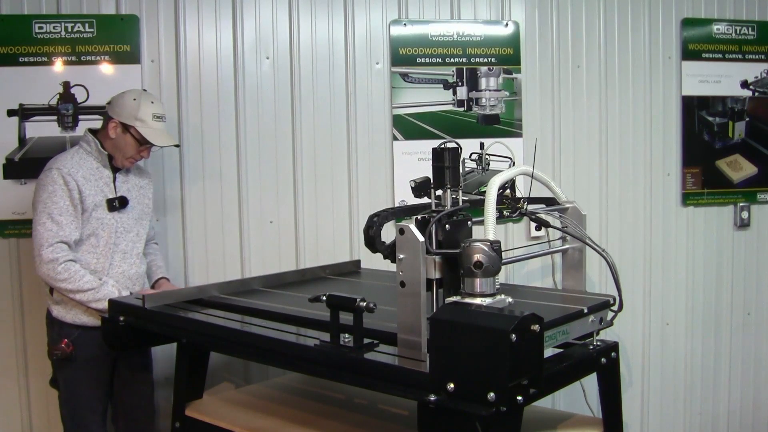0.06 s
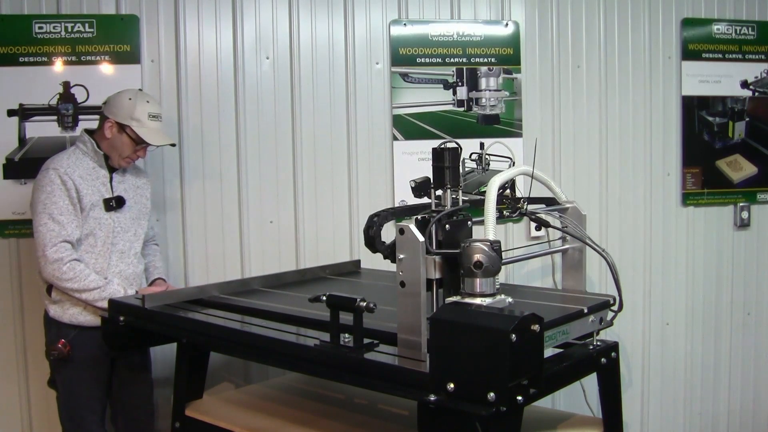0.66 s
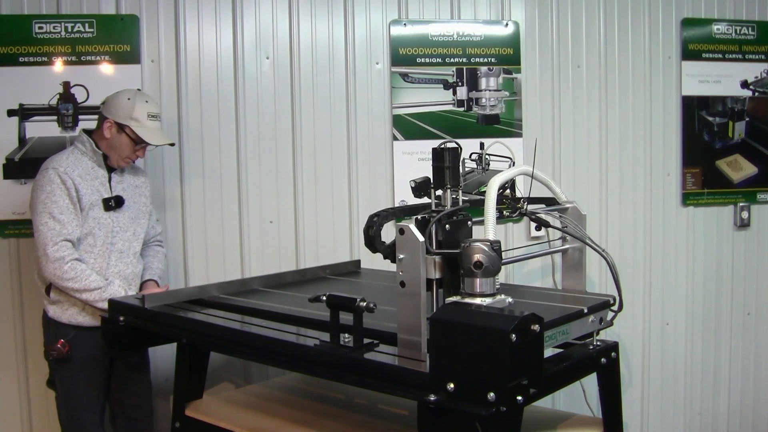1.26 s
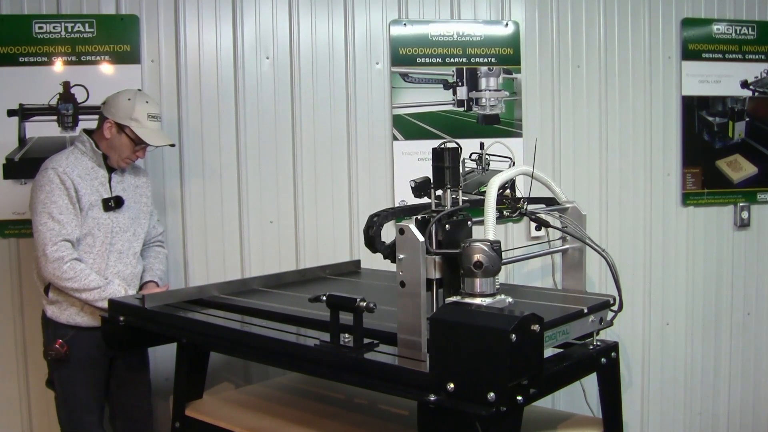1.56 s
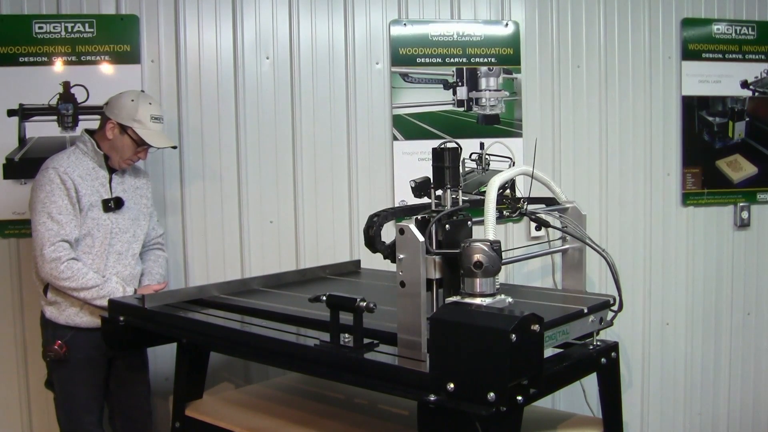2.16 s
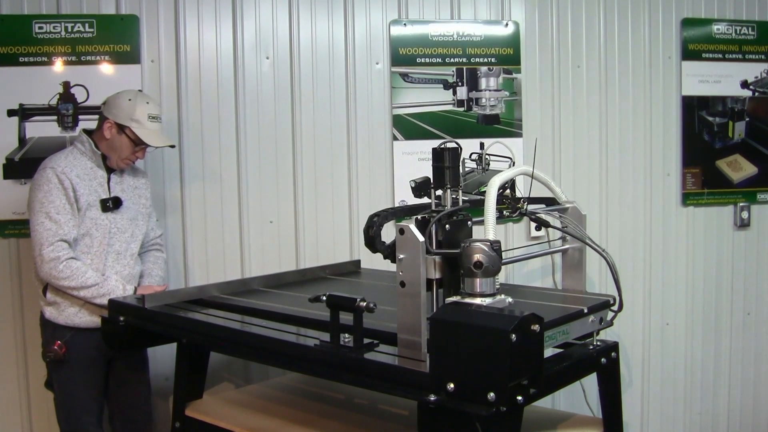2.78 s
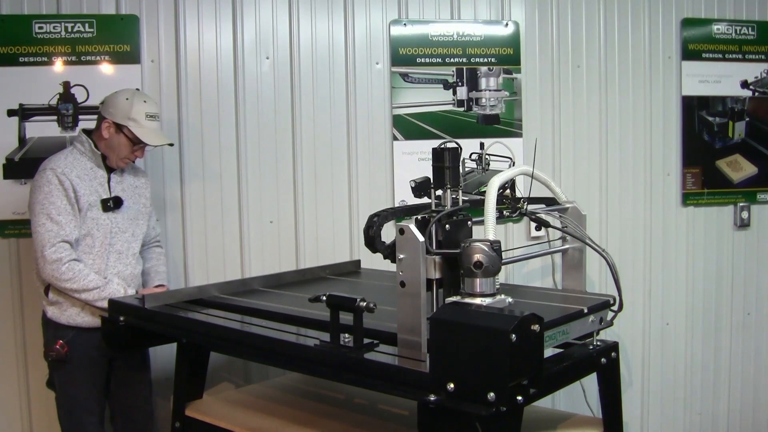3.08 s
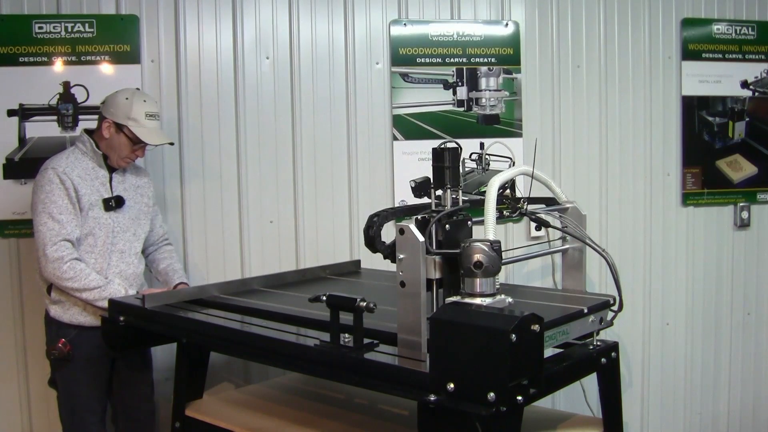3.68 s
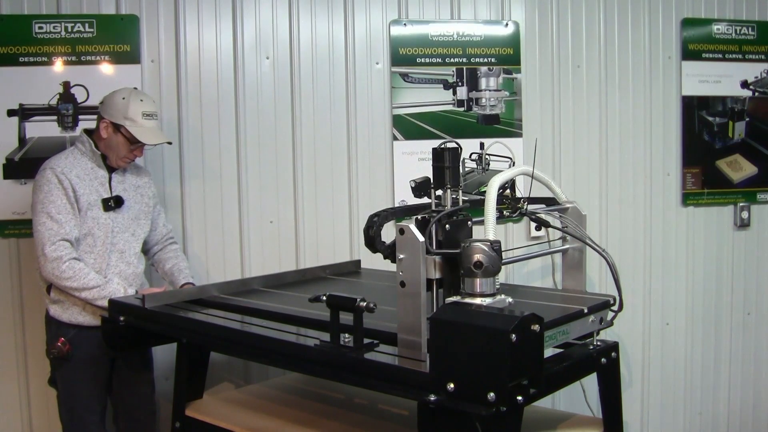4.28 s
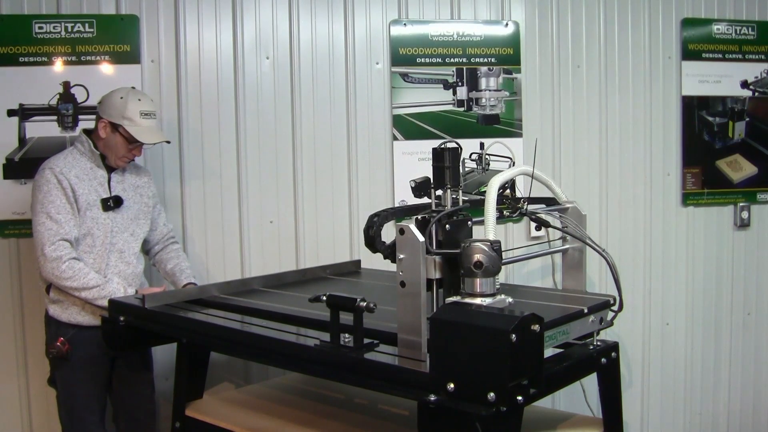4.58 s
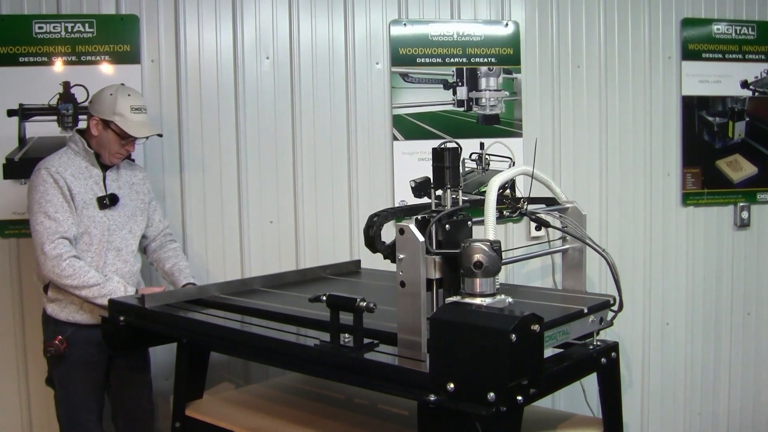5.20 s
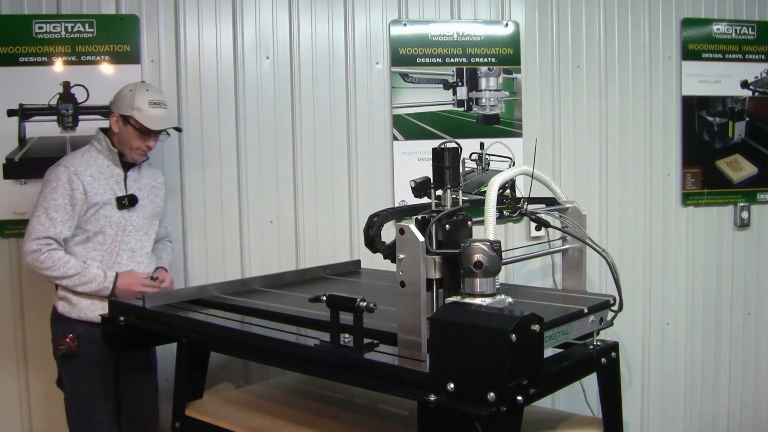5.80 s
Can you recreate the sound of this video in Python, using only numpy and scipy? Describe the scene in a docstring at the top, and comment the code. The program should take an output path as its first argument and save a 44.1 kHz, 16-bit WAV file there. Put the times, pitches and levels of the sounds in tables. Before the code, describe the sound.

In a small workshop, steel nuts and a clamp are handled on a slotted metal machine table. A sharp clang opens, followed by irregular knocks and pings. A nut whirrs briefly down its thread, then a hard knock rings out and a few tiny ticks follow. Near the end the clamp slides along its slot, hits home with a loud clang and scrapes softly again. Faint room noise lies underneath.

```python
"""A sharp clang, then knocks: steel nuts and a clamp are handled on a slotted machine table.
Each contact thuds in the bed, clangs in the rail and pings in the nut; a small workshop answers.
A nut whirrs down its thread, which later ticks. Near the end the clamp slides along its slot
and hits home. Faint room noise lies under it all."""
import sys
import numpy as np
from scipy import signal
from scipy.fft import rfft, irfft, next_fast_len
from scipy.io import wavfile
from scipy.ndimage import map_coordinates

SR = 44100
rng = np.random.default_rng(int(sys.argv[2]) if len(sys.argv) > 2 else 0)


def master_out(mix):
    """Clip the mix to full scale and print it as 16-bit PCM to the path in sys.argv[1]."""
    frames = np.transpose(np.atleast_2d(mix))
    ceiling = np.clip(frames, -1, 1)
    pcm = np.round(ceiling * 32767).astype(np.int16)
    wavfile.write(sys.argv[1], SR, pcm)


N = 257852
BLOW_SAMPLES = 24576


def amp(db):
    """Decibels to gain."""
    return 10 ** (np.asarray(db) / 20)


def unit(x):
    """Scale to rms 1."""
    return x / np.sqrt(np.mean(x ** 2) + 1e-20)


def along(points, hz):
    """Read a curve on a log frequency axis."""
    freqs, values = np.transpose(points)
    return np.interp(np.log(hz + 1), np.log(freqs), values)


def wobble(rate_hz):
    """Smooth random curve through rate_hz knots a second."""
    return map_coordinates(rng.standard_normal(2048), [np.arange(N) * rate_hz / SR], mode="wrap")


def noise(spectrum, size, tilt_db_oct=0):
    """Coloured noise of rms 1."""
    n_fft = next_fast_len(size)
    hz = np.fft.rfftfreq(n_fft, 1 / SR)
    gain = amp(along(spectrum, hz) + tilt_db_oct * np.log2(hz + 1))
    return unit(irfft(rfft(rng.standard_normal(n_fft)) * gain, n_fft)[:size])


def add(track, start_s, sound):
    """Mix a sound in at start_s."""
    start = round(start_s * SR)
    track[start:start + len(sound)] += sound[:N - start]


def decay(t, t60_s):
    """Free vibration falls 60 dB in t60_s."""
    return np.exp(-np.log(1000) * t / t60_s)


def onset(rise_s):
    """Build-up of a vibration."""
    return 1 - np.exp(-np.arange(BLOW_SAMPLES) / SR / rise_s)


def stroke(start_s, end_s, attack_s, release_s):
    """Speed, 0-1, of a movement that builds, holds and dies away."""
    t = np.arange(N) / SR
    attack = 1 - np.exp(-np.maximum(t - start_s, 0) / attack_s)
    return attack * np.exp(-np.maximum(t - end_s, 0) / release_s)


def ring(modes, t60_s, tilt_db_oct=0):
    """Clear modes take a new phase and strength at each blow."""
    hz, db = np.transpose(modes)[:2, :, None]
    t = np.arange(BLOW_SAMPLES) / SR
    strength = amp(db + tilt_db_oct * np.log2(hz / np.median(hz)) + rng.standard_normal(hz.shape))
    phase = 2 * np.pi * (hz * t + rng.random(hz.shape, dtype=np.float32))
    return np.sum(strength * decay(t, t60_s) * np.sin(phase), axis=0)


def body(spectrum, ragged_db, spacing_hz):
    """Crowded modes carve a part's spectrum into narrow peaks and valleys."""
    hz = np.arange(1, 1001) * spacing_hz
    depth_db = ragged_db * np.clip(hz / 1500, 0, 1)
    ripple_db = depth_db * np.clip(rng.standard_normal(len(hz)), -2, 2)
    return np.column_stack([hz, along(spectrum, hz) + ripple_db])


# Room air and low rumble spectra: freq_hz, density_db
AIR_SPECTRUM = [(12, -55), (20, -17), (60, -2.5), (127, -2), (146, -16), (177, -1), (204, -14), (241, -4.5),
                (328, -12), (472, -10), (678, -14.5), (802, -15.5), (2460, -21.5), (5230, -21.5),
                (16000, -32)]
RUMBLE_SPECTRUM = [(18, -22), (35, -3.5), (70, -1.5), (130, -4), (300, -48.5)]
def background(spin):
    """Steady room air, and a soft rumble while the nut spins."""
    return amp(-68.5) * noise(AIR_SPECTRUM, N) + amp(-60.5) * spin * noise(RUMBLE_SPECTRUM, N)


# Room decay: freq_hz, t60_s
ROOM_DECAY = [(130, 1), (250, 1), (400, 0.57), (1000, 0.53), (2200, 0.63), (5000, 0.54), (8000, 0.44),
              (14000, 0.297)]
def burst(spectrum, t60_s, room_db, tilt_db_oct=0):
    """Crowded modes die fast; the darker room holds each frequency for its own time."""
    direct = noise(spectrum, BLOW_SAMPLES, tilt_db_oct + 0.8) * decay(np.arange(BLOW_SAMPLES) / SR, t60_s)
    hz, t, bands = signal.stft(noise(spectrum, BLOW_SAMPLES, tilt_db_oct), SR, nperseg=256)
    bands *= decay(t, along(ROOM_DECAY, hz)[:, None])
    _, tail = signal.istft(bands, SR, nperseg=256)
    return direct + amp(room_db) * tail[:BLOW_SAMPLES]


# Thread ticks: start_s, level_db, tilt_db_oct
THREAD_TICKS = [(2.969, -56.5, 0), (3.031, -59.5, 0), (3.852, -57.5, 8)]
# Tick spectrum: freq_hz, density_db
TICK_SPECTRUM = [(300, -18), (1100, 12), (2000, -4), (4000, -13.5), (8000, -20), (16000, -75)]
def ticks():
    """The thread settles with tiny dry snaps."""
    out = np.zeros(N)
    for start_s, level_db, tilt_db_oct in THREAD_TICKS:
        snap = burst(TICK_SPECTRUM, t60_s=0.026, room_db=-16, tilt_db_oct=tilt_db_oct)
        add(out, start_s, amp(level_db) * snap)
    return out


# Thread friction spectrum: freq_hz, density_db
WHIRR_SPECTRUM = [(900, -20), (1700, -18), (2050, 3.5), (2600, 0), (3200, 7), (4500, -1.5), (6100, 0),
                  (7500, -5.5), (11000, -12), (15500, -21)]
def whirr(spin):
    """A flicked nut rubs down its thread and coasts to rest."""
    flutter = amp(1.5 * wobble(rate_hz=68))
    return amp(-65.5) * spin * unit(flutter * noise(WHIRR_SPECTRUM, N))


# Clamp pushes: start_s, end_s, full_speed_db
PUSHES = [(4.69, 5.27, -60), (5.568, 5.85, -53.5)]
# Slot friction spectrum: freq_hz, density_db
SLOT_SPECTRUM = [(120, -17), (200, -5), (224, -8), (316, -7.5), (379, 3), (639, -13), (791, -7),
                 (1010, -22), (1120, -19), (1250, -26), (2410, -23.5), (2980, -14), (3930, -23),
                 (5030, -19.5), (10000, -40), (13000, -70), (22000, -120)]
def slide():
    """The clamp rubs along the slot, catching unevenly; the bed hums under the hiss."""
    push = sum(amp(db) * stroke(start_s, end_s, attack_s=0.18, release_s=0.02)
               for start_s, end_s, db in PUSHES)
    catching = amp(0.85 * wobble(rate_hz=22) + 0.47 * wobble(rate_hz=120))
    return push * unit(catching * noise(SLOT_SPECTRUM, N))


# Crowded weak modes of bed and rail: freq_hz, density_db
BED_SPECTRUM = [(25, -68.5), (80, -35), (140, -13), (270, -14), (370, -1), (560, -5), (800, -4),
                (1200, -8.5), (1420, -18.5), (1780, -25), (2030, -19), (2400, -30), (6000, -64),
                (16000, -83)]
RAIL_SPECTRUM = [(200, -33.5), (700, 6.5), (1150, -1.5), (1420, -8), (1620, 7), (1780, -7.5), (2030, 6.5),
                 (2200, -6), (2550, 3), (3300, -4), (4700, -4.5), (6000, -43.5), (9000, -30),
                 (16000, -55.5)]
def table_bodies():
    """Bed and rail keep the same ragged spectra for every contact."""
    return (body(BED_SPECTRUM, ragged_db=5, spacing_hz=25.14),
            body(RAIL_SPECTRUM, ragged_db=4.5, spacing_hz=35.17))


def drag(swell_db_per_s=350):
    """Dragged parts rasp on the bed, ever louder until they seat."""
    t = np.arange(N) / SR
    swell = sum((t < seat_s) * amp(approach_db - 7 - swell_db_per_s * np.abs(seat_s - t))
                for seat_s, _, approach_db, *_ in SEATINGS)
    flutter = amp(0.83 * wobble(rate_hz=94))
    return swell * unit(flutter * noise(BED_SPECTRUM, N, tilt_db_oct=-2.5))


# Clear modes of bed and rail: pitch_hz, level_db
BED_RING = [(375, 3.5), (408, 0.5), (474, -5), (495, 0), (538, -11.5), (614, -15), (660, -4), (722, -11.5),
            (764, -6.5), (813, -12), (878, -10), (980, -5.5), (998, -6), (1030, -13), (1130, -10.5),
            (1238, -8.5), (1280, -15.5)]
RAIL_RING = [(1476, -12.5), (1990, -1.5), (2024, 3), (2060, -2), (2350, -2), (2584, -9.5), (3106, -4),
             (3480, -4.5), (4700, -17)]
# Nut ping and contact crack spectra: freq_hz, density_db
NUT_SPECTRUM = [(500, -20), (2000, -17), (3500, -9.5), (4600, 0), (5800, -4.5), (6900, -4.5), (7800, -12),
                (11000, -31), (16000, -43)]
CRACK_SPECTRUM = [(500, -2), (2500, -7), (5000, -4.5), (8000, 3), (11000, 1), (14000, -9.5), (16000, -18.5)]
def contact(bodies, bed_gain, tilt_db_oct, rail_gain, nut_db, crack_db):
    """One contact cracks and shakes bed, rail and nut; the wide bed rings up slowly."""
    bed_body, rail_body = bodies
    hum = amp(-6) * onset(rise_s=0.0079) * ring(BED_RING, t60_s=0.48, tilt_db_oct=tilt_db_oct)
    thud = amp(-0.79) * burst(bed_body, t60_s=0.13, room_db=-4, tilt_db_oct=tilt_db_oct)
    clang = burst(rail_body, t60_s=0.09, room_db=-4.5) + amp(-18.5) * ring(RAIL_RING, t60_s=0.63)
    nut_body = body(NUT_SPECTRUM, ragged_db=5, spacing_hz=68.4)  # new with every grip
    ping = amp(1.5) * burst(nut_body, t60_s=0.042, room_db=-14.5)
    crack = burst(CRACK_SPECTRUM, t60_s=0.033, room_db=-14.5)
    return bed_gain * (thud + hum) + rail_gain * clang + amp(nut_db) * ping + amp(crack_db) * crack


# Parts set down and bumped: start_s, force_db, rail_share, hardness, bed_tilt_db_oct, rise_s
BUMPS = [ (0.000, -38, 0.74, 0.95, 7, 0.0032), (0.367, -55, 0.41, 0.72, 2, 0.0025),
         (0.459, -59.5, 0.2, .25, -2, 0.0038), (0.736, -31.5, 0.14, .64, 1, 0.00047),
         (0.781, -34, .1, 0.6, -2.5, 0.0014), (1.498, -47.5, 0, 0.35, 2, 0.0017),
         (1.636, -40, 0.14, .42, 7.5, 0.00051), (1.661, -41.5, 0, 0.58, 0, 0.0046),
         (1.681, -42.5, 0.04, 0.6, 8.5, 0.0027), (1.704, -31, 0.14, 0.51, 2.5, 0.0011),
         (1.981, -43.5, 0.07, 0.3, 0, 0.0065), (2.078, -39.2, 0.09, .33, 2.5, 0.012),
         (2.127, -40, 0.24, 0.68, -0.5, 0.0017), (2.141, -36, 0.23, 0.58, 1, 0.0017),
         (3.170, -63, .4, 0.8, -0.5, 0.005), (3.666, -64, .3, .2, -4, 0.0042),
         (4.155, -65.5, 0.58, 0.88, -2, 0.0057), (5.304, -37.5, .92, 0.3, 0, 0.0049),
         (5.336, -22.5, 0.41, 0.1, 2.5, 0.0043), (5.387, -41.5, 0, 0.98, -5.5, 0.0013),
         (5.814, -55, 0, .15, 6, 0.0034), ]
def knocks(bodies):
    """Bed and rail share the force of a knock; hardness, 0-1, adds ping and crack."""
    out = np.zeros(N)
    # a light touch precedes each seating; columns as in BUMPS
    touches = [(touch_s, approach_db, 0.24, 0.59, 4.5, 0.0073) for _, touch_s, approach_db, *_ in SEATINGS]
    for start_s, force_db, rail_share, hardness, tilt_db_oct, rise_s in BUMPS + touches:
        bed_gain = amp(force_db) * (1 - rail_share)
        rail_gain = amp(force_db) * rail_share
        nut_db = force_db - 35 + 41 * hardness
        crack_db = force_db - 35.5 + 22.5 * hardness
        blow = contact(bodies, bed_gain, tilt_db_oct, rail_gain, nut_db, crack_db)
        add(out, start_s, blow * onset(rise_s))
    return out


# Nut modes: pitch_hz, level_db, t60_s
NUT_RING = [(4400, -11.5, .5), (4840, -12, 0.32), (5770, 14.5, 0.037), (5780, -10.5, .36),
            (6239, -11, 0.26), (6800, -26, 0.35), (9680, 8, 0.035), (9690, -22, 0.23)]
# Bolt and clamp modes: pitch_hz, level_db
BOLT_RING = [(538, -0.5), (1476, 2), (1530, 2), (1610, -6.5), (2137, -24.5), (3480, -11.5), (4920, -14),
             (5626, -23.5)]
CLAMP_RING = [(726, -0.5), (768, 2), (825, -2.5), (880, -2.5), (1101, 6), (1195, -0.5), (1260, -1),
              (1637, 0), (1695, 6.5), (1820, -5), (1938, -13), (2207, -4.5), (2297, -6), (2414, -8.5),
              (2640, -10.5), (2869, -9), (2997, -1.5), (3176, -5.5), (3289, -3.5), (3343, -1), (4280, -5.5),
              (4400, -15.5), (6185, -13), (7265, -19.5)]
# Hard hits that seat a part: seat_s, touch_s, approach_db, bed_db, bed_tilt_db_oct, rail_db,
# nut_db, crack_db, nut_ring_db, bolt_ring_db, clamp_ring_db
SEATINGS = [ (1.100, 1.080, -38.5, -34.5, 0, -41.5, -28, -49, -38.5, -87, -84),
            (2.589, 2.563, -40, -23.5, 1.5, -39.5, -34.5, -32, -51, -37, -59),
            (5.317, 5.277, -41.5, -30, 3.5, -25.5, -24, -40, -48.5, -78, -37.5), ]
def strikes(bodies):
    """A part hits home: the nut pings; the bolt and the heavier clamp ring on."""
    out = np.zeros(N)
    for seat_s, _, _, bed_db, tilt_db_oct, rail_db, nut_db, crack_db, *rings_db in SEATINGS:
        nut_ring_db, bolt_ring_db, clamp_ring_db = rings_db
        blow = contact(bodies, amp(bed_db), tilt_db_oct, amp(rail_db), nut_db, crack_db)
        nut = amp(nut_ring_db) * ring(NUT_RING, t60_s=np.array(NUT_RING)[:, 2:])
        bolt = amp(bolt_ring_db) * ring(BOLT_RING, t60_s=0.35)
        clamp = amp(clamp_ring_db + 1.5) * ring(CLAMP_RING, t60_s=0.55)
        add(out, seat_s, onset(rise_s=0.00067) * (blow + nut + bolt + clamp))
    return out


def scene():
    """Mono mix; the steel knocks and strikes carry hardly any deep bass."""
    bodies = table_bodies()
    bass_cut = signal.butter(2, 95, "highpass", fs=SR, output="sos")
    steel = signal.sosfilt(bass_cut, knocks(bodies) + strikes(bodies))
    spin = stroke(start_s=1.785, end_s=1.956, attack_s=0.018, release_s=0.078)
    return (steel + ticks() + whirr(spin) + drag() + slide() + background(spin))[None]


def record(dry):
    """Brick-wall low-pass on the top treble."""
    n_fft = next_fast_len(N + SR)
    hz = np.fft.rfftfreq(n_fft, 1 / SR)
    return irfft(rfft(dry, n_fft) * (hz < 15700), n_fft)[:, :N]


dry = scene()
out = record(dry)
master_out(out)
```